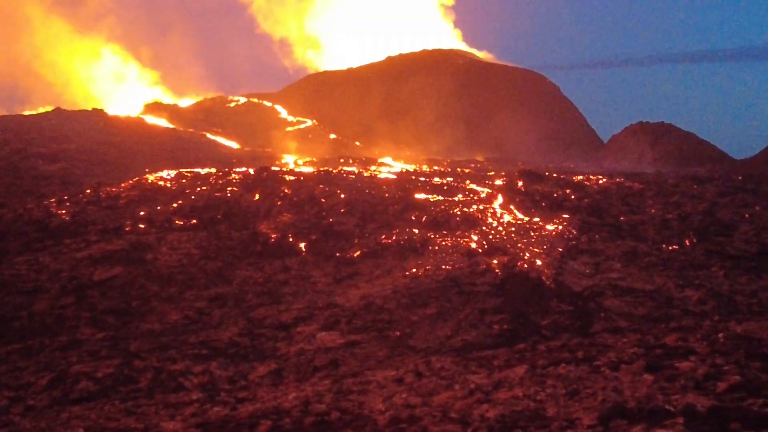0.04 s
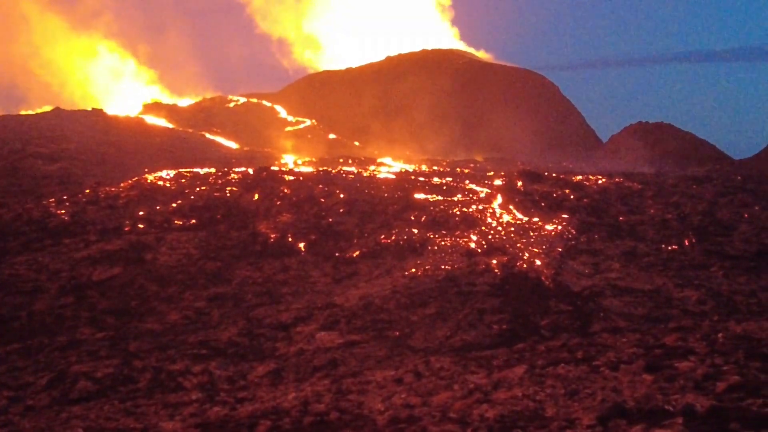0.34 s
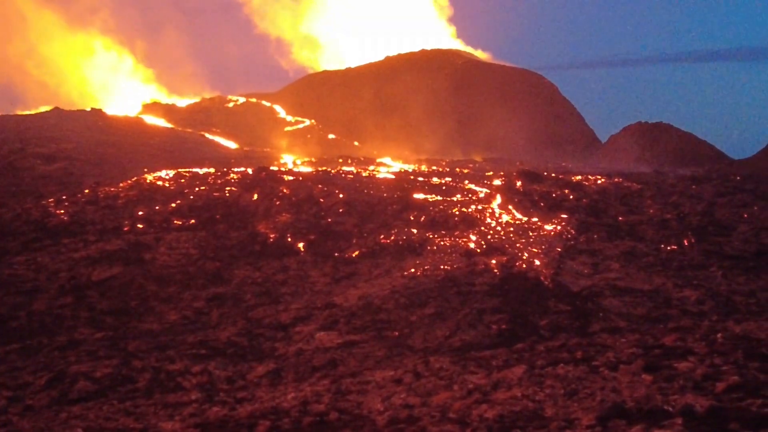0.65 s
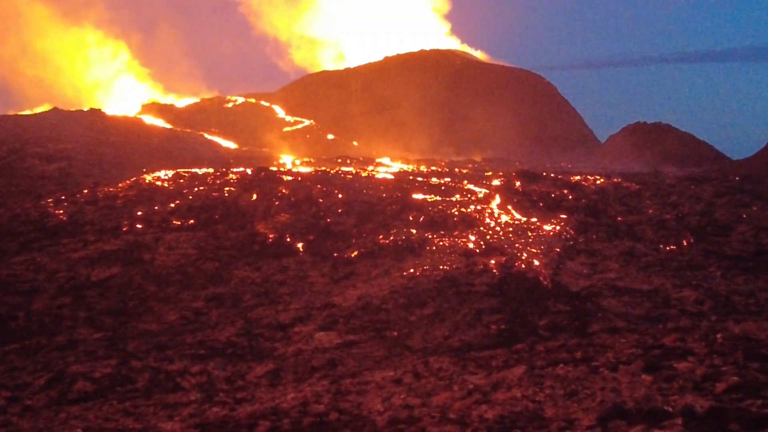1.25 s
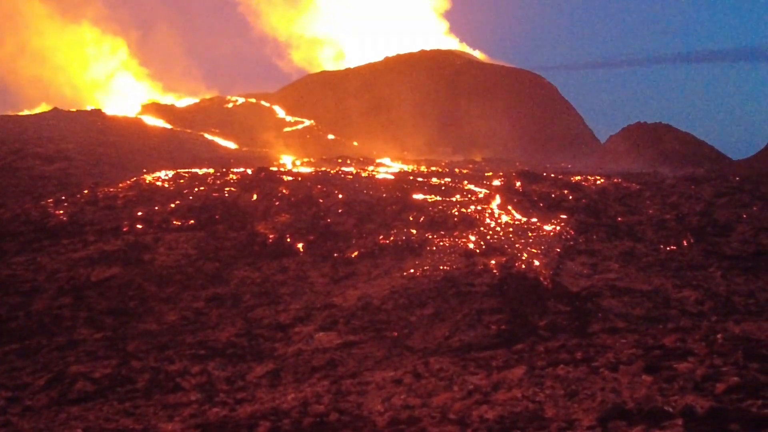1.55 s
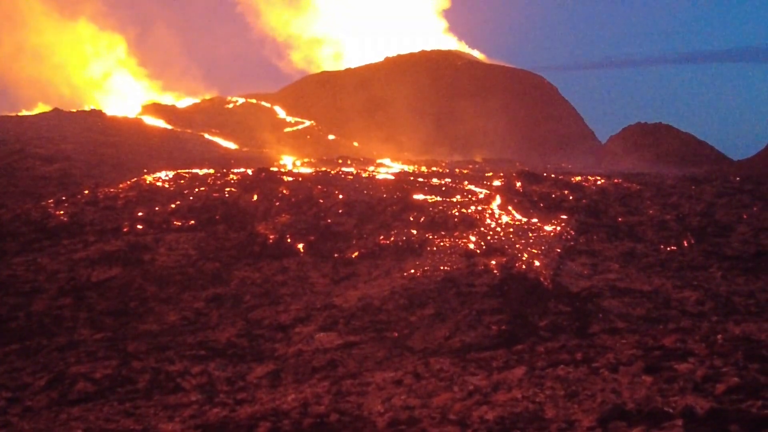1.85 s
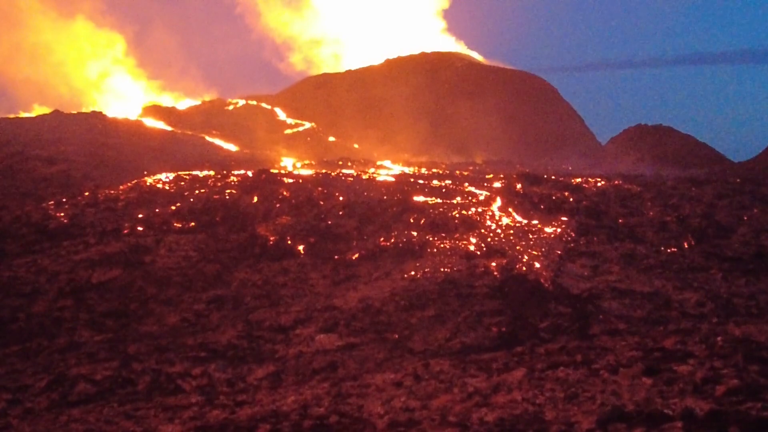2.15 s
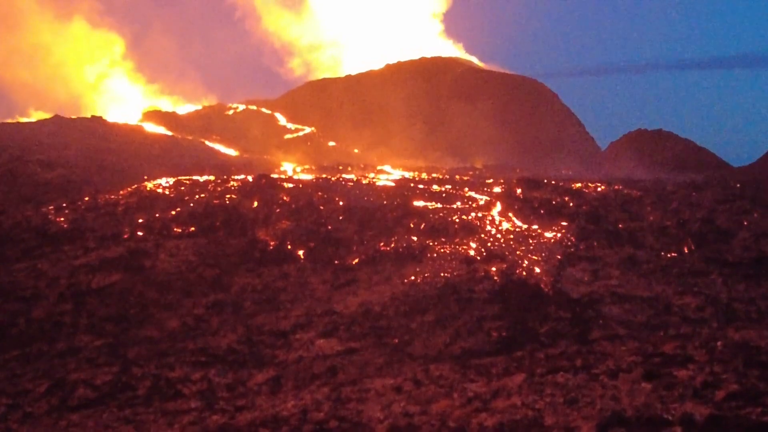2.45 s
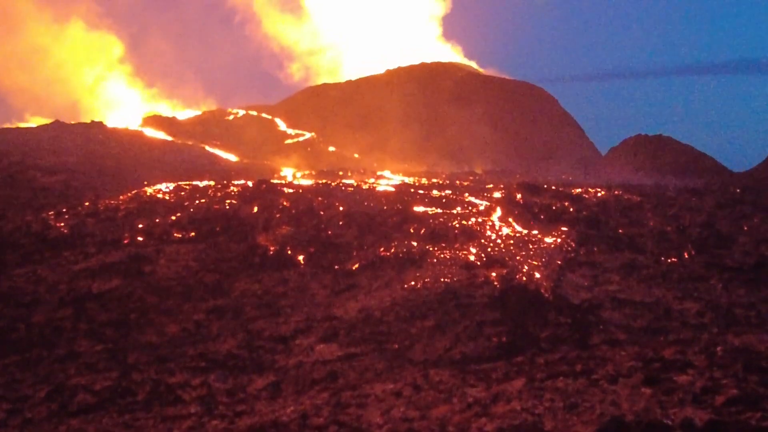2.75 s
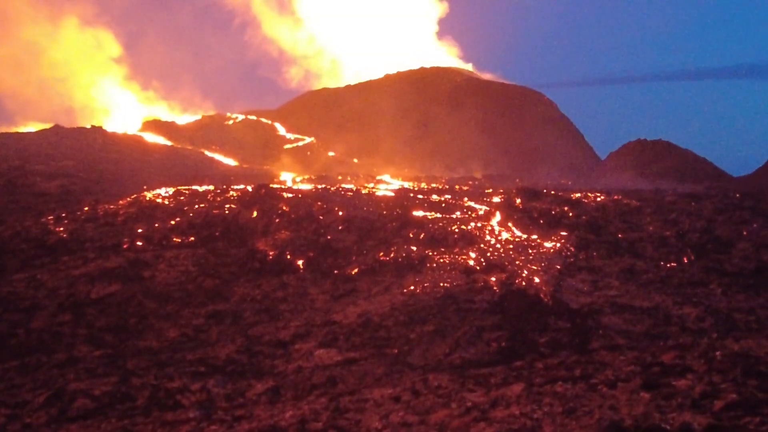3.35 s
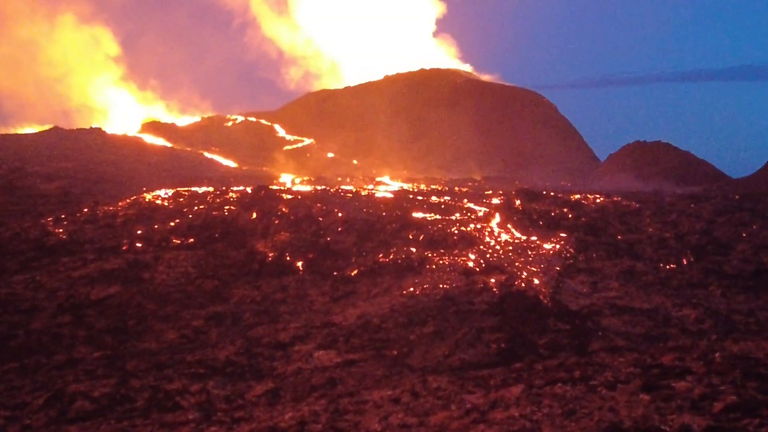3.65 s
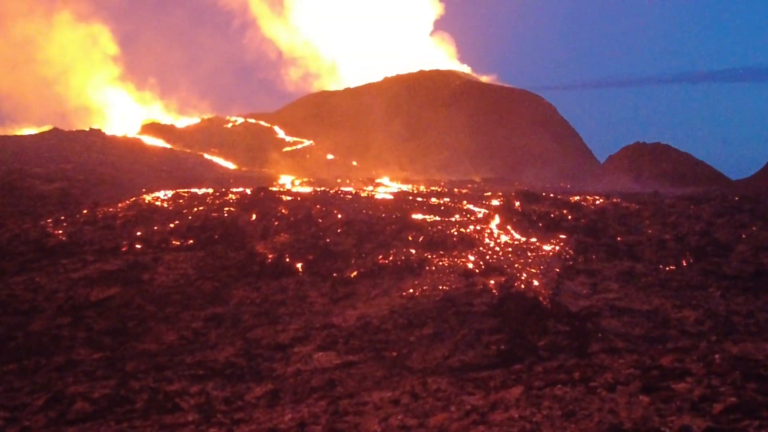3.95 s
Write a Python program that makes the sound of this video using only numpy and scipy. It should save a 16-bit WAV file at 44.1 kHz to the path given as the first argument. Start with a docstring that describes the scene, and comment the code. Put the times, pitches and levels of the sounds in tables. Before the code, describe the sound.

Wind buffets the microphone with a low, uneven rumble and a few soft thumps, out on open rocky ground. Behind it, a distant erupting volcano roars and surges, with faint gurgles and splats of lava.

```python
"""A gust rumbles on the microphone, out on rough ground with a lava fountain roaring some way off.
The wind keeps buffeting the stereo pair, and single eddies thump it. The distant jet of gas and lava
surges and sinks, with gurgles of bursting bubbles, faint splats and fine grit. A wide hiss of wind
over the ground slowly grows, and early on the air whistles thinly for a moment."""
import sys
import numpy as np
from scipy import signal
from scipy.fft import rfft, irfft
from scipy.io import wavfile
from scipy.ndimage import uniform_filter1d

SR = 44100
rng = np.random.default_rng(int(sys.argv[2]) if len(sys.argv) > 2 else 0)


def bounce(signal):
    """Save signal as a 16-bit WAV file at the path given by the first command-line argument."""
    frames = np.transpose(np.atleast_2d(signal))
    limited = np.clip(frames, -1, 1)
    pcm = np.round(limited * 32767).astype(np.int16)
    wavfile.write(sys.argv[1], SR, pcm)


N = 176400
T = np.arange(N) / SR
HZ = np.fft.rfftfreq(N, 1 / SR)
FOUNTAIN_PAN_DB = 0.76  # it stands a little to the left

# The stereo image starts narrow, then opens.
# Each row: time in seconds, side gain of the buffeting in dB, side gain of the roar in dB.
STEREO_WIDTH = [(0, -24, -16), (.9, -14, -4.5), (1.1, -0.5, -4), (1.8, 4, 1.5), (2.8, 2.5, 4), (3.3, 7, 5),
                (4, 6.5, 7.5)]


def amp(db):
    """Decibels to gain."""
    return 10 ** (np.asarray(db) / 20)


def unit(x):
    """Scales to rms 1."""
    return x / np.sqrt(np.mean(x ** 2) + 1e-20)


def spectrum(rows):
    """A frequency table at every bin, joined up on a log axis."""
    hz, value = np.transpose(rows)
    return np.interp(np.log(HZ + 1), np.log(hz + 1), value)


def curve(rows):
    """The columns of a time table at every sample."""
    s, *columns = np.transpose(rows)
    return [np.interp(T, s, column) for column in columns]


def wander(rate_hz):
    """Random drift of rms 1, up to about the given rate."""
    white = rfft(rng.standard_normal(N))
    return unit(irfft(white * HZ / (HZ + 2) / (1 + (HZ / rate_hz) ** 4), N))


def pan(left_db):
    """Gains that raise the left channel and lower the right by as much."""
    return amp([[left_db], [-left_db]])


def widened(x, side_db):
    """Scales the difference between left and right."""
    mid = x.mean(0)
    return mid + (x - mid) * amp(side_db)


def stereo_noise(colour, likeness, left_lead_s=0):
    """Noise of rms 1 with a given colour, left-right likeness and arrival difference."""
    alike = spectrum(likeness) if np.ndim(likeness) else likeness
    mid, side = rfft(rng.standard_normal((2, N)))
    mid, side = mid * np.sqrt((1 + alike) / 2), side * np.sqrt((1 - alike) / 2)
    channels = np.array([mid + side, mid - side])
    channels[1] *= np.exp(-2j * np.pi * HZ * left_lead_s)
    return unit(irfft(channels * amp(spectrum(colour)), N))


def band_noise(centre_hz, octaves):
    """Mono noise of rms 1 in a bell-shaped band."""
    band = np.exp(-.5 * (np.log2((HZ + 1) / centre_hz) / octaves) ** 2)
    return unit(irfft(rfft(rng.standard_normal(N)) * band, N))


def patchy(x, depth_db, bins, frames):
    """Lets patches of the spectrogram swell and sink at random; returns rms 1."""
    cells = signal.stft(x, nperseg=512, noverlap=384)[2]
    field = rng.standard_normal(cells.shape[1:])
    field = unit(uniform_filter1d(uniform_filter1d(field, bins, 0), frames, 1))
    mottled = signal.istft(cells * amp(depth_db * field), nperseg=512, noverlap=384)[1]
    return unit(mottled[:, :N])


def steadied(x, samples):
    """Evens out the slow chance swells of a noise."""
    power = (np.atleast_2d(x) ** 2).mean(0)
    return x / np.sqrt(uniform_filter1d(uniform_filter1d(power, samples), samples) + 1e-9)


def swell(peak_s, half_s):
    """A bell-shaped rise and fall in time."""
    return np.exp(-((T - peak_s) / half_s) ** 2)


def microphone_hiss():
    """The even hiss of the microphones themselves."""
    # Each row: frequency in Hz, relative density in dB.
    colour = [(200, 16.5), (3000, 11.5), (7500, 5.5), (10500, -3), (13000, -17), (15500, -3.5)]
    return stereo_noise(colour, likeness=0) * amp(-75.5)


def ground_hiss():
    """Wind over rough ground, reaching the microphone from all sides."""
    # Each row: frequency in Hz, relative density in dB.
    colour = [(200, -7), (800, -2), (1700, -1.5), (2300, -7.5), (3000, -7.5), (3600, -8.5), (5500, -16.5),
              (7000, -18), (7700, -19.5), (10500, -28), (12500, -26.5), (15500, -30.5)]
    # The breeze picks up. Each row: time in seconds, relative level in dB.
    breeze = [(0, -92), (.8, -73), (1.6, -74), (2, -68), (2.35, -64.5), (2.8, -66), (3.2, -64.5),
              (3.6, -62.5), (4, -63)]
    hiss = patchy(stereo_noise(colour, likeness=0.41), depth_db=1.07, bins=10, frames=18)
    return hiss * amp(curve(breeze)[0] + 0.5) * pan(0.87)


def whistle():
    """A fuzzy edge tone in the wind that wavers and breaks into flecks."""
    # Each row: time in seconds, pitch in Hz, level in dB.
    path = [(.42, 6750, -94), (.53, 7300, -91), (.64, 7670, -82), (.70, 6650, -85), (.9, 7330, -84),
            (1.0, 6520, -84), (1.2, 6520, -84), (1.3, 6400, -105)]
    hz, db = curve(path)
    hz = hz + 131 * wander(rate_hz=25)
    tone = unit(wander(rate_hz=240) * np.cos(2 * np.pi * np.cumsum(hz) / SR))
    flicker_db = 2 * wander(rate_hz=25)
    sounding = (T > path[0][0]) & (T < path[-1][0])
    return tone * amp(db + flicker_db) * sounding


def thumps():
    """Single eddies hit the microphone, each a short, deep swing of pressure."""
    # Each row: peak time in seconds, level in dB, pitch in Hz, half length in seconds.
    eddies = [(1.436, -32, 57, 0.017), (1.634, -30.5, 54.7, 0.015), (2.019, -27, 44, 0.022),
              (2.257, -25, 41.3, 0.021), (3.291, -27, 86, 0.0064), (3.44, -24, 68.5, 0.0079),
              (3.462, -37, 148, .007)]
    out = np.zeros(N)
    for (s, db, hz, half_s), turn in zip(eddies, rng.random(len(eddies))):
        out += amp(db) * swell(s, half_s) * np.cos(2 * np.pi * (hz * (T - s) + turn))
    return out


def buffeting():
    """Turbulence right at the microphone: a lumpy rumble, with a flutter above it that leaps in gusts."""
    # Each row: time in seconds, relative levels of the rumble and of the flutter in dB.
    gusts = [(0, -33, -38.5), (.13, -43.5, -49.5), (.2, -38.5, -50.5), (.26, -41.5, -42), (.43, -36.5, -46),
             (.53, -40, -54.5), (.68, -38, -41.5), (.86, -37.5, -51), (1.02, -48.5, -55.5),
             (1.07, -40, -46), (1.22, -44.5, -53), (1.31, -39, -47.5), (1.385, -46, -53), (1.44, -46, -45),
             (1.55, -47, -55), (1.76, -51, -57), (1.87, -44, -58.5), (2.0, -43.5, -54.5), (2.2, -40, -47),
             (2.36, -40.5, -54), (2.48, -47.5, -52.5), (2.76, -40, -59), (2.87, -41, -51.5),
             (2.95, -48.5, -54.5), (3.08, -43, -60.5), (3.26, -36, -43.5), (3.35, -38, -55.5),
             (3.45, -38, -45), (3.52, -40.5, -55.5), (3.7, -45, -56.5), (4, -39.5, -46.5)]
    # Each row of both: frequency in Hz, relative density in dB.
    rumble_colour = [(4, -8.5), (11, -17), (24, 5.5), (42, -1), (75, -6), (105, -16.5), (150, -28.5),
                     (300, -79), (900, -87), (4000, -140)]
    flutter_colour = [(30, -20), (70, 6.5), (105, 8), (160, -3.5), (215, -10.5), (300, -19.5), (600, -55),
                      (2000, -53), (8000, -130)]
    # Both ports feel nearly the same eddies. Each row: frequency in Hz, left-right likeness from 0 to 1.
    likeness = [(25, .998), (60, 1), (110, 0.99), (200, 0.96), (500, 0.87)]
    rumble_db, flutter_db = curve(gusts)
    lumps = wander(rate_hz=13.4)
    rumble = steadied(stereo_noise(rumble_colour, likeness), samples=2600)
    rumble *= amp(rumble_db + 2.5 + 1.5 * lumps)
    flutter = steadied(stereo_noise(flutter_colour, likeness), samples=1800)
    flutter *= amp(flutter_db + 1.72 + lumps)
    return widened(rumble + flutter, curve(STEREO_WIDTH)[0])


def grit():
    """Tiny ringing grains of uneven size, weaker with every octave up."""
    # Each row: time in seconds, level in dB.
    levels = [(0, -79), (.6, -79), (1.15, -77.5), (1.6, -86), (2.6, -83), (4, -73.5)]
    low_hz, high_hz, pitches, grains_per_s = 2515, 7710, 20, 520
    ring_cycles, spread_db, db_per_octave = 28, 2, -5
    out, t = np.zeros((2, N)), T[:2000]
    for hz in np.geomspace(low_hz, high_hz, pitches):
        hits = rng.random(N) < grains_per_s / pitches / SR
        sizes = amp(spread_db * np.minimum(rng.exponential(1, N), 3))
        age = t * hz / ring_cycles
        grain = age * np.exp(-2 * age) * np.sin(2 * np.pi * hz * t)
        grain *= amp(db_per_octave * np.log2(hz / low_hz))
        out += signal.oaconvolve(hits * sizes, grain)[:N] * pan(rng.normal(0, 1))
    return unit(out) * amp(curve(levels)[0])


def splats():
    """Far-off splats and soft ticks: short bursts of noise that stand a little out of the roar."""
    # Each row: start in seconds, level in dB, centre in Hz, width in octaves, decay in seconds,
    # leftward pan in dB.
    bursts = [(.218, -73, 4760, 0.42, .018, 1), (0.498, -52, 930, 0.47, 0.015, 2.5),
              (0.872, -66, 3020, 0.52, 0.012, 3), (.98, -81, 10770, .03, 0.019, 3),
              (2.615, -63.5, 1880, 0.19, 0.023, 0), (3.487, -49, 1450, 0.84, 0.0033, -0.5)]
    out, rise_s = np.zeros((2, N)), 0.0035
    for s, db, centre_hz, octaves, decay_s, left_db in bursts:
        age = np.maximum(T - s, 0)
        envelope = np.minimum(age / rise_s, 1) * np.exp(-np.maximum(age - rise_s, 0) / decay_s)
        out += amp(db) * envelope * band_noise(centre_hz, octaves) * pan(left_db)
    return out


def gurgles():
    """Big gas bubbles burst in the lava, each a short, hollow patch of noise."""
    # Each row: peak time in seconds, level in dB, centre in Hz.
    bubbles = [(.16, -58, 720), (.78, -55, 510), (.84, -55, 536), (1.06, -58, 760), (1.515, -57, 780),
               (1.565, -56, 533), (1.69, -57.5, 634)]
    out, width_hz = np.zeros(N), 44
    for s, db, centre_hz in bubbles:
        band = np.exp(-.5 * ((HZ - centre_hz) / width_hz) ** 2)
        hollow = steadied(irfft(rfft(rng.standard_normal(N)) * band, N), samples=1000)
        out += amp(db) * swell(s, half_s=0.01) * hollow
    return out * pan(FOUNTAIN_PAN_DB)


def gushes():
    """Gushes of gas swell the fountain's middle range, in the centre of the image."""
    # Each row: peak time in seconds, level in dB, centre in Hz, half length in seconds.
    rushes = [(0.12, -70, 1000, 0.2), (0.847, -66, 1150, 0.13), (1.657, -61.5, 605, 0.068),
              (3.214, -70, 980, 0.17), (3.79, -60.5, 800, 0.18)]
    out = np.zeros(N)
    for s, db, centre_hz, half_s in rushes:
        out += amp(db) * swell(s, half_s) * band_noise(centre_hz, octaves=0.67)
    return out


def fountain():
    """The jet of gas and lava: a churning, throbbing roar, dulled by distance."""
    # Each row: time in seconds, relative level in dB.
    surges = [(0, -54), (.2, -56.5), (.42, -58.5), (.56, -56.5), (.72, -57.5), (.95, -57), (1.15, -57),
              (1.35, -58.5), (1.5, -59), (1.75, -58.5), (2.0, -61.5), (2.43, -64.5), (2.75, -61.5),
              (2.97, -63), (3.2, -60), (3.42, -63), (3.6, -60.5), (3.8, -60), (4.0, -61.5)]
    # The roar as it reaches the microphone. Each row: frequency in Hz, relative density in dB.
    colour = [(40, 3.5), (150, -2.5), (320, -1.5), (480, 2.5), (750, -0.5), (1150, -3.5), (1700, -8.5),
              (2300, -17), (2900, -18), (3700, -18), (5800, -28.5), (9000, -32), (15000, -39.5)]
    # Each row: frequency in Hz, left-right likeness from 0 to 1.
    likeness = [(100, 1), (300, 0.92), (520, 0.9), (890, 0.59), (1520, 1), (2600, 0.54), (8000, 0.35)]
    roar = stereo_noise(colour, likeness, left_lead_s=0.00004)
    roar = patchy(roar, depth_db=2.5, bins=3, frames=12)
    throb_db = 0.38 * wander(rate_hz=30)
    roar *= amp(curve(surges)[0] + 1.38 + throb_db)
    return widened(roar, curve(STEREO_WIDTH)[1]) * pan(FOUNTAIN_PAN_DB)


def scene():
    """Wind at the microphone in front of the distant eruption."""
    eruption = fountain() + gushes() + gurgles() + splats() + grit()
    wind = buffeting() + thumps() + ground_hiss() + whistle()
    return eruption + wind + microphone_hiss()


def record(dry):
    """A brief fade at each end, the microphone's uneven treble, then the band limit."""
    # Each row: frequency in Hz, microphone gain in dB.
    response = [(1500, -0.5), (1850, 0.5), (2150, -0.5), (2700, 1), (3200, 1), (3550, -5.5), (4300, -1),
                (6100, 1.5), (7000, -4), (7700, 0.5), (8400, -2), (9500, 0.5), (10000, -2), (12400, 0.5),
                (13200, -10), (15500, 5.5)]
    fade_s, edge_hz = 0.006, 15750
    fade = np.sin(np.pi / 2 * np.minimum(np.minimum(T, T[::-1]) / fade_s, 1)) ** 2
    coloured = irfft(rfft(dry * fade) * amp(spectrum(response)), N)
    lowpass = signal.firwin(511, edge_hz, window=("kaiser", 9), fs=SR)
    return signal.oaconvolve(coloured, lowpass[None], "same")


dry = scene()
out = record(dry)
bounce(out)
```